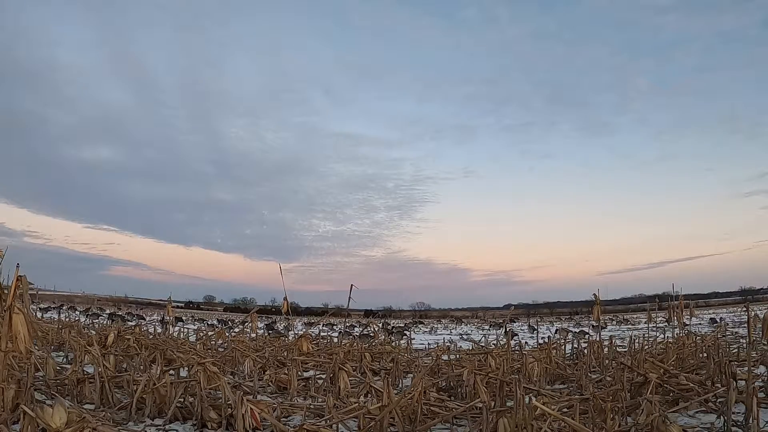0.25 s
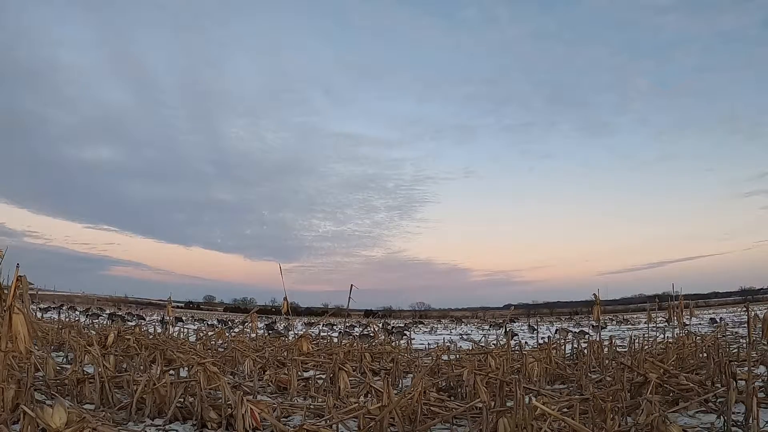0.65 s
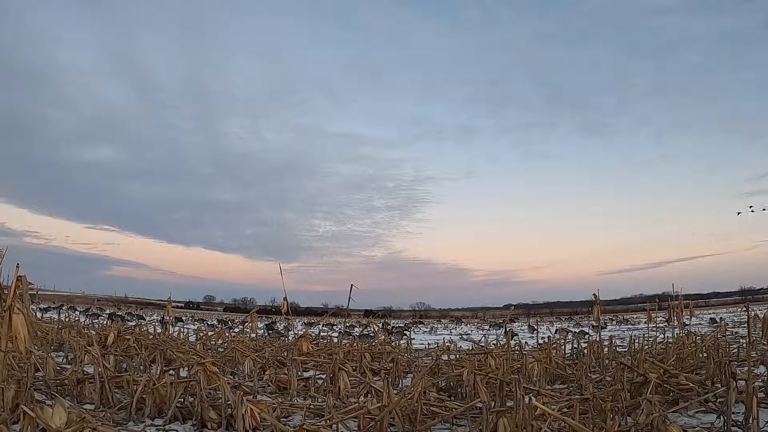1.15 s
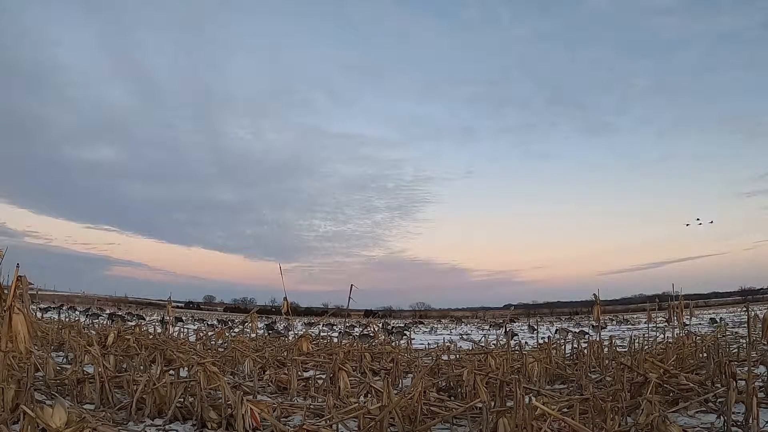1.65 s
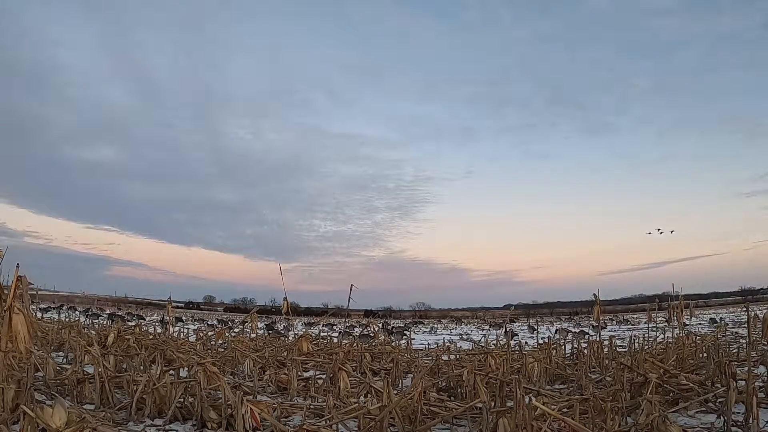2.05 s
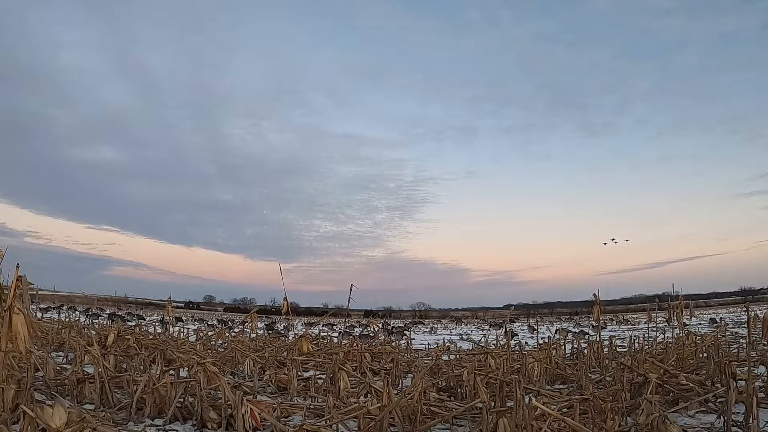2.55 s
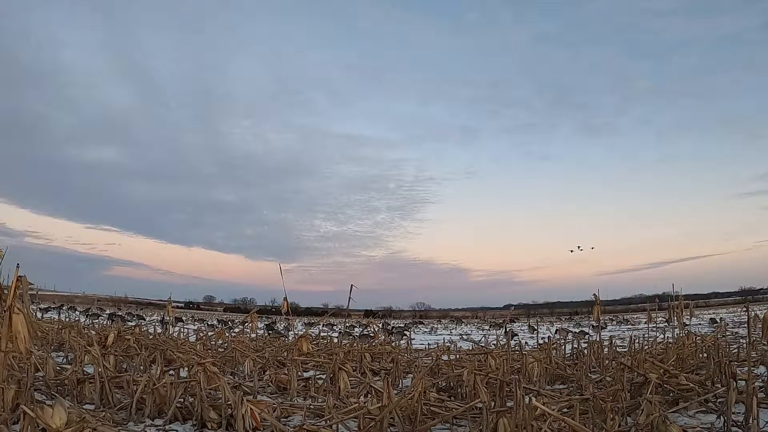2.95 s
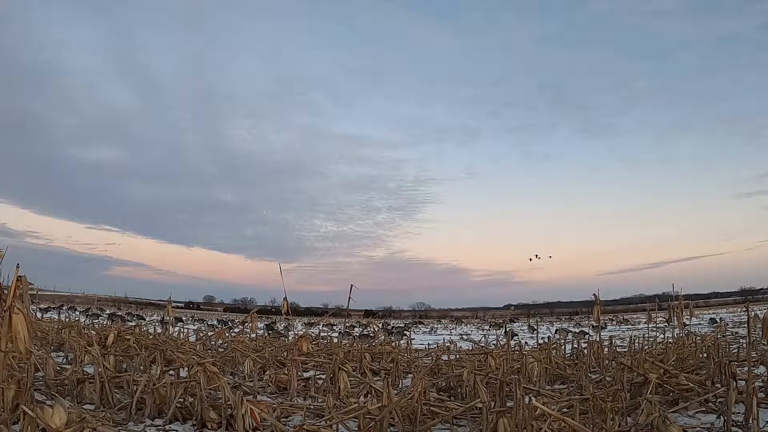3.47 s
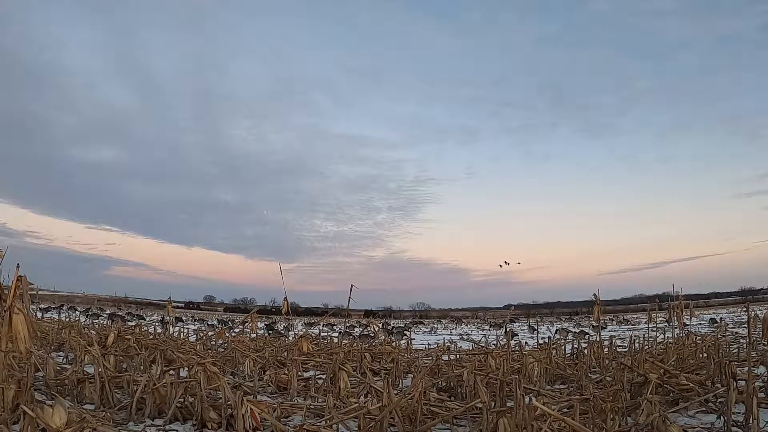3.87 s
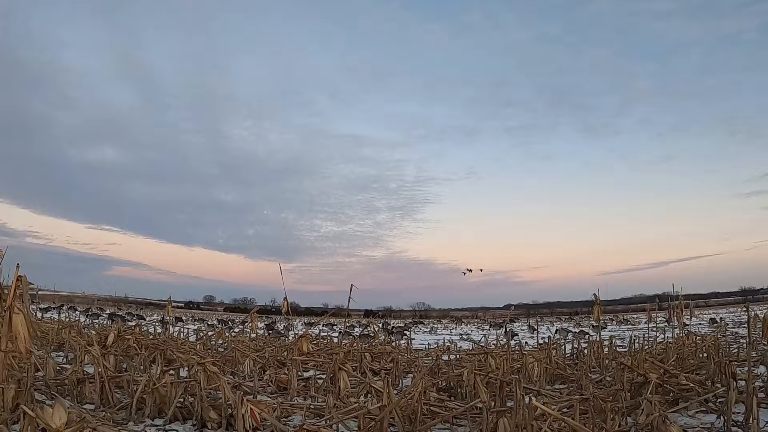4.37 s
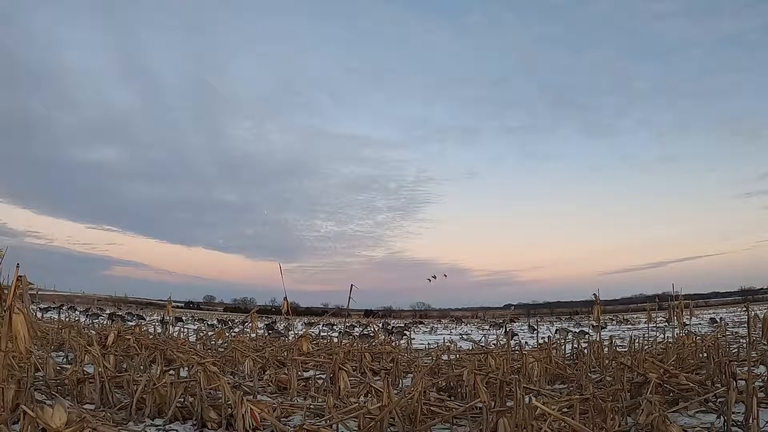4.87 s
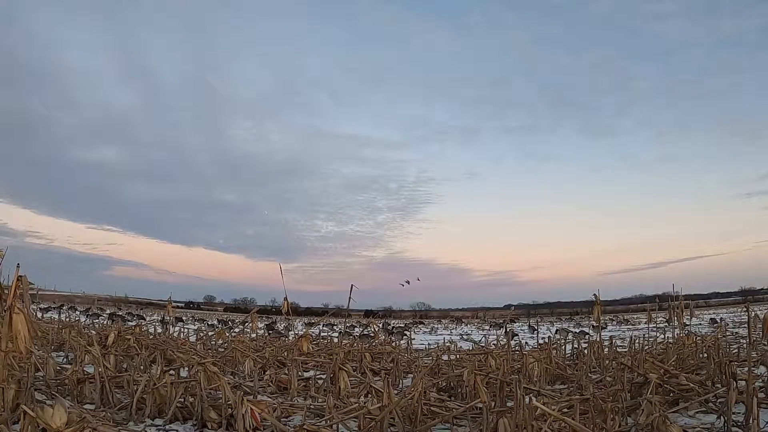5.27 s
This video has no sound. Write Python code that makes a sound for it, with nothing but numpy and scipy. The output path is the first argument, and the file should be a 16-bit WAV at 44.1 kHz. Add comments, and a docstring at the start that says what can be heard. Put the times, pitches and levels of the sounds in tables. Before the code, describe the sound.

A wide, quiet winter field with low wind rumble, a soft rush leaning left, and irregular dull thumps on the microphone, mostly left. At 0.1 s a reed goose call close on the left begins a hollow, nasal moan, rising slightly and firming until it drops off at 0.95 s; a far goose yips and holds a wavering honk beneath it until 0.43 s. Faint, low distant tones hover until about 1.5 s, when mainly wind remains. Around 1.95 s geese ahead and slightly right give gruff clucks and a soft honk. Clearer honks follow at about 2.9, 3.6, 4.2, 4.7, 5.25 and 5.5 s, most starting with a short yip and gruff rattle, cracking into a ringing tone, then falling to a faint rasp. Small clucks come near 3.9, 4.5 and 5.07 s. Calls become higher, louder and brighter. Dry stalks rustle faintly, clearest near 4.5 s; a slight field echo follows.

```python
"""A few geese fly in over a stubble field, ahead and to the right: most calls are a yip, a gruff stretch and a
clear, falling honk, built from syrinx harmonics or from single beats ringing in throat and beak.
Close by on the left a reed goose call gives one long moan, a sum of harmonics with weak lines between.
Wind rumbles and thumps on the two-port microphone and dry corn stalks rustle, all from shaped noise.
The open land adds a soft noise rush and a faint echo; a few low sine tones come from far away."""
import sys
import numpy as np
from scipy import signal
from scipy.fft import rfft, irfft, next_fast_len
from scipy.io import wavfile
from scipy.ndimage import uniform_filter1d, map_coordinates

SR = 44100
rng = np.random.default_rng(int(sys.argv[2]) if len(sys.argv) > 2 else 0)


def transcribe(u):
    """Save the signal u as a 16-bit wav file named by the first command-line argument.

    u: samples, shape (n,) or (channels, n), limited to [-1, 1]; the rate is SR.
    q: integer samples, one column per channel.
    """
    v = np.clip(np.atleast_2d(u).T, -1, 1)
    q = np.round(v * 32767).astype(np.int16)
    wavfile.write(sys.argv[1], SR, q)


N = 243431
T = np.arange(N) / SR


def amp(db):
    """Decibels to gain."""
    return 10 ** (np.asarray(db) / 20)


def unit(x):
    """Scale to rms 1."""
    return x / np.sqrt(np.mean(x ** 2) + 1e-20)


def along(points, hz):
    """Read (f/Hz, value) points on a log frequency axis."""
    f, value = np.transpose(points)
    return np.interp(np.log(hz + 1), np.log(f + 1), value)


def curves(rows, t):
    """Each column after the time, read at the times t."""
    s, *columns = np.transpose(rows)
    return [np.interp(t, s, column) for column in columns]


def span(start, end, fade=0.005):
    """Sample times of a sound and its soft-edged gate."""
    t = T[(T > start - fade) & (T < end + fade)]
    to_edge = np.minimum(t - start + fade, end + fade - t)
    return t, np.sin(np.pi / 2 * np.clip(to_edge / (2 * fade), 0, 1)) ** 2


def add(track, t, x):
    """Mix x into the track at the times t."""
    first = round(t[0] * SR)
    track[..., first:first + len(t)] += x


def wobble(rate, t):
    """A smooth random curve, rate knots a second."""
    knots = rng.standard_normal(4096)
    return map_coordinates(knots, [(t - t[0]) * rate + 2], mode="mirror")


def filtered(x, response):
    """x times a response of frequency."""
    size = x.shape[-1]
    m = next_fast_len(size + 8192)
    return irfft(rfft(x, m) * response(np.fft.rfftfreq(m, 1 / SR)), m)[..., :size]


def place(x, balance, lag_samples):
    """Put a source to one side by level (left over right, dB) and by arrival time between the ports."""
    side = np.array([[1], [-1]]) / 2

    def response(hz):
        delay = np.exp(-2j * np.pi * hz * side * lag_samples / SR)
        return amp(side * along(balance, hz)) * delay
    return filtered(x, response)


# how alike the two microphone ports hear diffuse noise: f/Hz, correlation (1 = identical)
PORT_LIKENESS = [(60, 0.9), (110, 1), (210, 0.82), (380, 0.99), (700, 0.63), (1300, 0.73), (2400, 0.27),
                 (4450, 0.055), (8230, 0.37)]


def stereo_noise(spectrum, patchy_db):
    """Noise with patches of random gain; mid and side shares set how alike the ports are, the mid has rms 1."""
    z = signal.stft(rng.standard_normal((2, N)), nperseg=512)[2]
    patches = uniform_filter1d(rng.standard_normal(z.shape[1:]), size=4, axis=0)
    patches = uniform_filter1d(patches, size=14, axis=1)
    pair = signal.istft(z * amp(patchy_db * unit(patches)), nperseg=512)[1][:, :N]

    def response(hz):
        turn = np.arccos(np.clip(along(PORT_LIKENESS, hz), -1, 1)) / 2
        return amp(along(spectrum, hz)) * np.array([np.cos(turn), np.sin(turn)])
    mid, side = filtered(pair, response)
    return np.array([mid + side, mid - side]) / np.std(mid)


# wind rumble spectrum on the microphone: f/Hz, relative level/dB
RUMBLE_SPECTRUM = [(12, -37), (20, 1), (38, 0), (72, 1.5), (162, -13.5), (198, -18.5), (236, -34.5),
                   (311, -31), (400, -44), (520, -59.5), (880, -120)]
# steady wind, left port over right: f/Hz, level/dB
WIND_BALANCE = [(30, 1.5), (95, 1.6), (310, 0.69)]
# gusts and thumps, left port over right: f/Hz, level/dB
GUST_BALANCE = [(30, 22), (150, 11), (400, 21.5)]


def wind(rumble_db=-37.5, swing_db=1.58, gust_db=-12, gust_s=0.061, gust_top_hz=130):
    """A rumble at both ports; gusts of low noise swell around each thump and strike mostly the left port."""
    rumble = amp(rumble_db + swing_db * wobble(9.2, T)) * stereo_noise(RUMBLE_SPECTRUM, patchy_db=0.25)
    # gust_db is against the thump, gust_s the width of its bell-shaped swell
    strength = sum(amp(db + gust_db) * np.exp(-.5 * ((T - s) / gust_s) ** 2) for s, db, *_ in THUMP_EVENTS)
    eddies = filtered(rng.standard_normal((2, N)),
                      lambda hz: amp(along(RUMBLE_SPECTRUM, hz)) / (1 + (hz / gust_top_hz) ** 4))
    gusts = strength * unit(eddies)
    return place(rumble, WIND_BALANCE, lag_samples=0) + place(gusts + thumps(), GUST_BALANCE, lag_samples=0)


# rush over the open land: f/Hz, relative level/dB
LAND_SPECTRUM = [(130, -23.5), (220, -2.5), (286, -7), (318, -4), (344, -7), (377, -3.5), (407, -4.5),
                 (697, 0), (963, 1.5), (1290, -4), (1460, -3.5), (2050, -13), (2960, -25), (3610, -34.5),
                 (8680, -52.5), (11300, -95.5), (19100, -120)]
# the rush, left port over right: f/Hz, level/dB
LAND_BALANCE = [(60, 2.0), (100, -1), (180, -0.5), (310, 2), (530, 5.5), (920, 11), (1600, 9.5), (2760, 14),
                (4760, 3), (8230, 2.5)]


def land(rush_db=-47.5, swell_db=0.9, swell_rate=1.2):
    """The soft noise of the open field, mostly from the left, swells and ebbs with the breeze."""
    level = amp(rush_db + swell_db * wobble(swell_rate, T))
    return place(level * stereo_noise(LAND_SPECTRUM, patchy_db=0.5), LAND_BALANCE, lag_samples=0.3)


# faint low tones from far away: t/s, length/s, f/Hz, mean peak level/dB
DISTANT_TONES = [(0.0, 0.78, 430, -55), (0.0, 0.62, 318, -57), (0.867, 0.44, 369.2, -56.5),
                 (0.98, 0.3, 430.3, -53), (1.033, 0.49, 328.4, -55.5), (1.083, 0.23, 492, -53)]


def far_tones(waver_db=2):
    """Sines of steady pitch fade in and out at the edge of hearing, wavering in level."""
    out = np.zeros(N)
    for s, length, hz, level_db in DISTANT_TONES:
        t, gate = span(s, s + length, fade=0.048)
        add(out, t, gate * amp(level_db + waver_db * wobble(2.5, t)) * np.sin(2 * np.pi * hz * t))
    return out


# resonance of a goose's throat: f/Hz, level/dB
THROAT_GAIN = [(900, -64), (1200, 6.5), (1650, -5), (2200, -17.5), (2900, -32), (3500, -47.5), (4000, -100)]
# bright ring of its open beak: f/Hz, level/dB
BEAK_GAIN = [(1700, -51), (2200, -15.5), (2950, -12.5), (3550, -7), (4480, -12.5), (4780, -17), (5250, -18),
             (5550, -23.5), (6600, -21.5), (7500, -22.5), (8300, -46), (9300, -40), (11500, -58),
             (12500, -74)]


def voice(t, pitch, level_db, low_db, treble_db, jitter, flutter_db, colour=lambda k: 0, rattle=0):
    """Syrinx harmonics through throat and beak; the beak part flutters, a rattle stresses every third cycle."""
    faint_db, faint_dulling = -53, 0.15  # below this treble level the top harmonics dim too (dB per dB)
    stray_rad_per_db = 0.1  # moving air also shakes the phase of the high harmonics
    phase = 2 * np.pi * np.cumsum(pitch * (1 + jitter * wobble(530, t))) / SR
    tone = amp(low_db) * np.sin(phase)
    stress = rattle * (np.cos(phase / 3 + wobble(90, t)) + wobble(400, t) / 3)
    for k in range(2, 16):
        throat = amp(level_db + along(THROAT_GAIN, k * pitch))
        shimmer_db = flutter_db * (0.6 * wobble(35, t) + 0.7 * wobble(140, t))
        dull_db = faint_dulling * np.maximum(faint_db - treble_db, 0) * (k > 6)
        beak = amp(treble_db + along(BEAK_GAIN, k * pitch) + shimmer_db - dull_db)
        stray = stray_rad_per_db * flutter_db * (k > 4) * wobble(76, t)
        strength = amp(colour(k)) * (throat * (1 + stress / 2) + beak * (1 + stress))
        tone += strength * np.sin(k * phase + stray + rng.uniform(-np.pi, np.pi) / 2)
    return np.sqrt(2) * tone


# yips that open most calls: t/s, length/s, mid-note f/Hz, throat level/dB, mid-note treble level/dB
YIP_NOTES = [(0.095, 0.026, 733, -42.5, -84), (2.781, 0.034, 715, -45, -61.5), (3.5, 0.034, 725, -43, -55),
             (4.103, 0.048, 730, -41.5, -63.5), (4.603, 0.022, 741, -38, -57.5),
             (5.16, 0.038, 764, -37, -53)]


def yips(rise=0.065, rough=0.0089, dull_db=6):
    """A short rising note that roughens as the voice breaks."""
    out = np.zeros(N)
    for s, length, hz, level_db, treble_db in YIP_NOTES:
        t, gate = span(s + 0.0038, s + length, fade=0.0064)
        u = (t - s) / length
        pitch = hz * (1 + rise * (u - .5))
        note = voice(t, pitch, level_db, level_db - 4.5, treble_db + 8 * (u - .5), rough * u,
                     flutter_db=6.0, colour=lambda k: -dull_db * (k > 6))
        add(out, t, gate * note)
    return out


# the long moan: t/s, f/Hz of its strong second harmonic, level before trim/dB
MOAN_PATH = [(0.122, 897.5, -44.5), (0.145, 908, -32), (0.166, 922, -32.5), (0.22, 935.4, -33.5),
             (0.301, 952, -33.5), (0.382, 949, -35.5), (0.445, 984.6, -29), (0.51, 986, -29.5),
             (0.57, 1004, -28), (0.73, 1020, -26), (0.862, 1023, -28.5), (0.896, 1015, -29),
             (0.917, 994, -33.5), (0.934, 950, -38.5), (0.95, 973, -56.5)]
# the reed's weak lines against its harmonics: t/s, halfway lines level/dB, quarter lines level/dB
REED_LINES = [(0.14, -21, -18), (0.26, -17, -19.5), (0.4, -11.5, -21.5), (0.53, -14, -21.5),
              (0.6, -26, -17), (0.92, -35.5, -19)]
# resonance of the call's barrel: f/Hz, level/dB
BARREL_GAIN = [(400, -24.5), (520, -27.5), (800, -41.5), (930, -2.5), (1100, -1.5), (1250, -6.5),
               (1420, -18), (1530, -19), (1870, -38), (1960, -24), (2050, -38.5), (2200, -30),
               (2440, -31.5), (2550, -27.5), (2700, -38.5), (2900, -34), (3060, -35), (3400, -46.5),
               (3570, -44.5), (4000, -55), (4400, -49), (4600, -42.5), (4850, -58), (5100, -55.5),
               (5700, -62), (7700, -71.5), (8600, -98.5)]


def moan(level_trim_db=5.0, overtone_db=-21, overtone_follow=0.2, bloom_db=9, bloom_s=0.092,
         release_db=14, release_s=0.031, flank_lift_db=9.0, flank_tilt_db=0.34, dull_db=5.5,
         haze_db=-45, haze_hz=3000):
    """Reed harmonics with weak lines at each quarter pitch between; all wander in level, with a noise haze."""
    out = np.zeros(N)
    t, gate = span(MOAN_PATH[0][0], MOAN_PATH[-1][0])
    second_hz, level_db = curves(MOAN_PATH, t)
    half_db, quarter_db = curves(REED_LINES, t)
    pitch = second_hz / 2
    over_db = overtone_db + overtone_follow * (level_db - level_db.max())
    over_db -= bloom_db * np.exp((t[0] - t) / bloom_s)
    over_db -= release_db * np.exp((t - t[-1]) / release_s)
    loose = 1 / (1 + np.exp((t - 0.45) / 0.016))  # the reed is unsteady until the blow is firm
    jitter = 0.0012 * (1 + 1.5 * loose)
    phase = 2 * np.pi * np.cumsum(pitch * (1 + jitter * wobble(300, t))) / SR
    for quarter in range(3, 68):
        k = quarter / 4
        overtone, weak = k > 3.6, quarter % 4 > 0
        flank_db = [0, quarter_db, half_db, quarter_db][quarter % 4]
        flank_db = np.minimum(flank_db + overtone * (flank_lift_db + flank_tilt_db * (k - 4)), 0)
        drive_db = over_db if overtone else level_db + level_trim_db
        soft_db = dull_db * loose * np.clip(k - 7, 0, 2)  # a soft blow lacks the top harmonics
        wander_db = (0.25 * min(k, 9) + 1.3 * weak) * (wobble(12, t) + 0.5 * wobble(60, t))
        line_db = drive_db + along(BARREL_GAIN, k * pitch) + flank_db - soft_db + wander_db
        add(out, t, np.sqrt(2) * gate * amp(line_db) * np.sin(k * phase + rng.uniform(0, 2 * np.pi)))
    puffs = rng.standard_normal(len(t)) * (1 + np.cos(phase))  # noise at each slap of the reed
    haze = filtered(puffs, lambda hz: amp(along(BARREL_GAIN, hz)) * hz ** 6 / (hz ** 6 + haze_hz ** 6))
    add(out, t, gate * amp(over_db + haze_db) * unit(haze))
    return out


def croak(t, level_db, throat_hz, treble_db, slack_db, unsteady=1, rasp_top_hz=5200, rest_hz=1170, tighten=0.42):
    """The low register: beats ring the throat at the second harmonic and snap in the beak; each third is strong."""
    scatter_db, scatter_s = 2.5, 0.00011  # beat strength and timing
    throat_scatter, throat_ring_s = 0.06, 0.0012  # share of the ring's pitch, and its decay
    rasp_hz, rasp_width_hz, rasp_db = 4050, 550, 6  # the snaps' extra peak, before the throat's stretch
    cycles = np.cumsum(throat_hz / 2) / SR
    beat = np.arange(int(cycles[-1]))
    chance = rng.standard_normal((80, 4))[beat]
    weak = beat % 3 > 0
    beats = np.interp(beat, cycles, t) + unsteady * scatter_s * chance[:, 0]
    body_size = amp(scatter_db * chance[:, 1] + slack_db * weak)
    snap_size = amp(scatter_db * chance[:, 2] + slack_db * weak)
    age = np.maximum(t - beats[:, None], 0)
    ring = np.exp(-age / throat_ring_s)
    ring_hz = np.interp(beats, t, throat_hz) * (1 + unsteady * throat_scatter * chance[:, 3])
    body = body_size @ (ring * np.sin(2 * np.pi * ring_hz[:, None] * age))
    body = filtered(body, lambda hz: 1 / (1 + (hz / 2200) ** 6))
    snaps = snap_size @ np.sinc((t - beats[:, None]) * SR / 2)  # one click a closure
    stretch = (np.mean(throat_hz) / rest_hz) ** tighten  # a tighter throat rings higher in the beak too

    def beak_response(hz):
        relaxed_hz = hz / stretch
        peak_db = rasp_db * np.exp(-.5 * ((relaxed_hz - rasp_hz) / rasp_width_hz) ** 2)
        return amp(along(BEAK_GAIN, relaxed_hz) + peak_db) / (1 + (hz / rasp_top_hz) ** 10)
    rasp = filtered(snaps, beak_response)
    return amp(level_db) * unit(body) + amp(treble_db) * unit(rasp)


# gruff stretches that lead into a honk, most after a yip: t/s, length/s, first throat f/Hz,
# final throat f/Hz, final level/dB, opening treble level/dB, closing treble level/dB
GRUFF_STRETCHES = [(0.169, 0.048, 1304, 1194, -40, -74, -70), (2.11, 0.035, 1134, 1300, -40.5, -70, -71),
                   (2.814, 0.091, 973, 1300, -34, -61, -45), (3.523, 0.085, 1006, 1324, -32, -55, -49),
                   (4.129, 0.063, 1010, 1280, -34.5, -55, -50), (4.629, 0.072, 1111, 1428, -32.5, -54, -43),
                   (5.184, 0.063, 1218, 1388, -32.5, -46, -40), (5.431, 0.054, 1152, 1410, -36.5, -54, -50)]


def gruff(climb_s=0.042, swell_db=6, opening_db_per_s=454.5, closing_db_per_s=479.5, rattle_db=-12):
    """A low rattle glides to its final note and swells; its rasp fades after the opening and grows into the honk."""
    out = np.zeros(N)
    for s, length, low_hz, final_hz, level_db, opening_db, closing_db in GRUFF_STRETCHES:
        t, gate = span(s, s + length)
        age = np.clip(t - s, 0, length)
        slack = np.minimum((length - age) / climb_s, 1)
        throat_hz = final_hz + (low_hz - final_hz) * slack
        treble_db = np.maximum(opening_db - opening_db_per_s * age,
                               closing_db - closing_db_per_s * (length - age))
        add(out, t, gate * croak(t, level_db - swell_db * slack, throat_hz, treble_db, rattle_db))
    return out


# the first, drawn-out honk: t/s, mean f/Hz, mean throat level/dB
LONG_HONK_PATH = [(0.19, 690, -46), (0.216, 677, -37), (0.264, 698, -35), (0.3, 705.7, -38.5),
                  (0.351, 709, -36), (0.405, 671, -38.5), (0.435, 655, -52)]
HOARSE = 0.12  # depth of the rattle that stays in any honk


def long_honk(low_db=-6, treble_db=-27, pulse_hz=26, pulse_db=2.5, waver=0.004):
    """One far goose holds a wavering honk; its level pulses as it sounds together with the reed's third harmonic."""
    out = np.zeros(N)
    t, gate = span(LONG_HONK_PATH[0][0], LONG_HONK_PATH[-1][0])
    pitch, level_db = curves(LONG_HONK_PATH, t)
    pulse = np.cos(2 * np.pi * pulse_hz * (t - t[0]) + wobble(18, t) / 2)
    wavering = pitch * (1 + waver * wobble(45, t))
    call = voice(t, wavering, level_db + pulse_db * pulse, level_db + low_db, level_db + treble_db,
                 jitter=0.0053, flutter_db=7.0, rattle=HOARSE)
    add(out, t, gate * call)
    return out


# wind thumps on the microphone, before left-right balance: t/s, level/dB, width/s, eddy f/Hz
THUMP_EVENTS = [(0.317, -31, 0.017, 77), (0.371, -35.5, 0.017, 112.2), (0.495, -26.5, 0.012, 120),
                (0.589, -34, 0.0047, 118.5), (1.213, -33.5, 0.0095, 116.3), (2.054, -41.5, 0.019, 100.4),
                (2.358, -36.5, 0.021, 81), (2.65, -39.5, 0.011, 107.3), (3.084, -25, 0.0057, 117),
                (3.247, -36.5, 0.0056, 109.4), (4.048, -33.5, 0.0091, 70.3), (4.757, -24, 0.011, 112.4),
                (4.958, -30, 0.013, 79), (5.187, -29.5, 0.0044, 126)]


def thumps(own_db=-6):
    """Single eddies hit the microphone: a few slow swings of pressure, a little different at each port."""
    out = np.zeros((2, N))
    for s, level_db, width, eddy_hz in THUMP_EVENTS:
        t = s + (np.arange(SR // 4) - SR // 8) / SR
        swell = np.exp(-.5 * ((t - s) / width) ** 2)
        # shared swirl plus each port's own
        swirl = rng.standard_normal(len(t)) + amp(own_db) * rng.standard_normal((2, len(t)))
        eddy = swell * filtered(swirl, lambda hz: (hz / eddy_hz) / (1 + (hz / eddy_hz) ** 4.7))
        eddy *= np.linalg.norm(swell) / np.linalg.norm(eddy, axis=1, keepdims=True)
        add(out, t, amp(level_db) * eddy)
    return out


# dry stalks rustling: t/s, level/dB, time to fall 60 dB/s
RUSTLE_EVENTS = [(1.64, -68.5, 1), (2.515, -67, 0.094), (3.512, -67.5, 0.13), (4.476, -58.5, 0.17)]
# colour of a dry stalk: f/Hz, relative level/dB
STALK_SPECTRUM = [(1500, -22.5), (3000, 5.5), (4700, -8), (6000, -7.5), (7800, -8.5), (8800, -29),
                  (12000, -29.5), (14000, -70.5)]


def stalks(grain_db=4.5):
    """Dry leaves scrape in grainy bursts of noise that start fast and die away."""
    level = 0
    for s, db, decay in RUSTLE_EVENTS:
        attack = np.clip((T - s) / 0.013 + 1, 0, 1)
        level = level + amp(db - 60 * np.maximum(T - s, 0) / decay) * attack
    leaves = stereo_noise(STALK_SPECTRUM, patchy_db=2)
    return level * unit(amp(grain_db * wobble(1100, T)) * leaves)


# lone gruff clucks: t/s, length/s, throat f/Hz, glide/share, peak level/dB, peak treble level/dB,
# weak beats level/dB, unsteadiness (1 = the full scatter of a croak)
CLUCK_CALLS = [(1.962, 0.05, 1036, 0.063, -39.5, -71.5, -10, 1.1),
               (2.014, 0.1, 1014, 0.09, -36.5, -64, -4.5, 0.7), (3.897, 0.1, 1182, 0, -46.5, -71, -9, 0.9),
               (4.499, 0.046, 1175, 0, -41.5, -72.5, -18, 1),
               (5.069, 0.058, 1345, -0.088, -37.5, -54.5, -9, 0.45)]


def clucks(edge_db=10, treble_edge_db=17, bend=0.019, early=0.93):
    """A cluck stays in the low register; it may glide, and level and rasp peak just before the middle."""
    out = np.zeros(N)
    for s, length, hz, glide, level_db, treble_db, slack_db, unsteady in CLUCK_CALLS:
        t, gate = span(s, s + length)
        u = np.clip((t - s) / length, 0, 1)
        edge = (2 * u ** early - 1) ** 2
        throat_hz = hz * (1 + glide * (u - .5) - bend * edge)
        cluck = croak(t, level_db - edge_db * edge, throat_hz, treble_db - treble_edge_db * edge,
                      slack_db, unsteady)
        add(out, t, gate * cluck)
    return out


# clear honks: t/s, length/s, base f/Hz, pitch drift/share, settling/s, base throat level/dB,
# base fundamental level/dB, third harmonic lift/dB, fourth harmonic lift/dB, base treble level/dB,
# treble dimming/dB, mid-honk beak ring f/Hz
HONK_CALLS = [(2.125, 0.13, 681.5, 0.012, 0.024, -44.5, -44, -1.5, -8.5, -64.5, 3, 3700),
              (2.881, 0.17, 693.7, 0.026, 0.012, -38.5, -41.5, 0, -3.5, -57.5, 10.5, 3900),
              (3.597, 0.15, 717.5, 0.0089, 0.011, -37, -42.5, 3, 6, -56.5, 4.5, 3800),
              (4.179, 0.12, 725, 0.0044, 0.016, -33.5, -42.5, -3, 5.5, -57.5, 9.5, 4030),
              (4.687, 0.1, 745.3, -0.014, 0.0038, -30, -41, -2.5, -3, -38.5, 6, 4000),
              (5.236, 0.12, 748, 0.002, 0.0034, -29, -41.5, 2, -11, -35, 7, 4600),
              (5.484, 0.071, 816, -0.035, 0.006, -29, -43.5, -3, -4, -41.5, 1, 4650)]


def honks(steady=0.0018, fray=0.01, sag_db=1, low_sag_db=4, arch_db=3, waver=0.0022):
    """Each honk cracks in, locks into an arching tone whose ring slides upward, and frays as it falls."""
    scoop, scoop_s = 0.013, 0.015  # share below pitch at the start, and its decay time
    onset_db, onset_s = 4, 0.009  # how far down it swells in from, and how fast
    crack, crack_rattle = 0.021, 1.1  # pitch scatter and rattle depth as it cracks in
    fall, fall_s = 0.12, 0.046  # share the pitch drops as the air runs out, and over what time
    release_db, release_s = 18, 0.009  # the voice dies away
    shut_db, shut_s = 36, 0.041  # the treble goes first, as the beak shuts
    slide_hz, ring_width_hz, ring_db = 800, 540, 9  # the beak's ring
    near_flutter_db, flutter_grows = 1.4, 0.14  # grows as the treble fades with distance (dB per dB)
    out = np.zeros(N)
    for (s, length, hz, drift, settle, level_db, low_db, third_db, fourth_db,
         treble_db, dimming_db, beak_hz) in HONK_CALLS:
        t, gate = span(s, s + length, fade=0.004)
        age, left = np.maximum(t - s, 0), np.maximum(s + length - t, 0)
        past_middle = age / length - .5
        falling = np.maximum(1 - left / fall_s, 0) ** 2
        shutting = np.maximum(1 - left / shut_s, 0) ** 2
        cracking = np.exp(-age / settle)
        bend = drift * past_middle - scoop * np.exp(-age / scoop_s) - fall * falling
        pitch = hz * (1 + bend + waver * wobble(40, t))
        swell_in_db = onset_db * np.exp(-age / onset_s)
        loss_db = release_db * np.exp(-left / release_s) + sag_db * past_middle + swell_in_db
        treble_loss_db = swell_in_db / 2 + dimming_db * past_middle + shut_db * shutting
        jitter = steady + crack * cracking + fray * falling
        ring_hz = beak_hz + slide_hz * past_middle
        flutter_db = near_flutter_db + flutter_grows * max(-35.5 - treble_db, 0)

        def colour(k):
            lift_db = {3: third_db, 4: fourth_db}.get(k, 0)
            arch = (k > 2) * arch_db * (2 * past_middle) ** 2
            ring = np.exp(-.5 * ((k * pitch - ring_hz) / ring_width_hz) ** 2) - .5
            return lift_db - arch + (k > 4) * ring_db * ring
        honk = voice(t, pitch, level_db - loss_db, low_db - loss_db - low_sag_db * past_middle,
                     treble_db - treble_loss_db, jitter, flutter_db, colour, HOARSE + crack_rattle * cracking)
        add(out, t, gate * honk)
    return out


def creaks(length_s=0.059, lead_s=0.021, body_db=-17, rasp_db=-22, fade_db=14, drop=0.09):
    """As a honk falls, the voice slips back into its low register and trails off in a faint rasp."""
    out = np.zeros(N)
    for s, length, hz, _, _, level_db, *_, treble_db, _, _ in HONK_CALLS:
        start = s + length - lead_s
        if start < T[-1]:  # skip a creak past the end of the sound
            t, gate = span(start, start + length_s)
            fading_db = fade_db * (t - start) / length_s
            throat_hz = np.full(len(t), 2 * hz * (1 - drop))
            creak = croak(t, level_db + body_db - fading_db, throat_hz,
                          treble_db + rasp_db - fading_db, slack_db=0.0)
            add(out, t, gate * creak)
    return out


# echo of the land: f/Hz, t60/s
LAND_DECAY = [(300, 9.9), (1200, 1.9), (3000, 0.64), (8000, 0.097)]


def echo(x):
    """Stubble and far tree lines scatter the calls back: a decaying noise tail, the treble dying first."""
    hz, t, z = signal.stft(rng.standard_normal((2, SR)), SR, nperseg=256)
    decay = amp(-60 * t / along(LAND_DECAY, hz)[:, None])
    tail = signal.istft(z * decay, SR, nperseg=256)[1]
    return signal.fftconvolve(x[None], tail / np.linalg.norm(tail[0]), axes=1)[:, :N]


# geese, left port over right: f/Hz, level/dB
GEESE_BALANCE = [(700, -2.5), (1500, -4), (2800, -0.5), (4500, -1)]
# reed call, left port over right: f/Hz, level/dB
REED_BALANCE = [(1600, 3.26), (2700, 8.3), (4700, 1.3), (8000, 1)]


def scene():
    """Geese ahead and to the right, the reed call close on the left, wind all round."""
    geese = yips() + gruff() + long_honk() + clucks() + honks() + creaks()
    reed = moan()
    calls = place(geese, GEESE_BALANCE, lag_samples=1.69) + place(reed, REED_BALANCE, lag_samples=0.91)
    sent_out = amp(-23.0) * geese + amp(-46.5) * reed
    scattered = filtered(sent_out, lambda hz: 1 / (1 + (hz / 3500) ** 2))  # distance dulls it
    return wind() + land() + far_tones() + calls + stalks() + echo(scattered)


TOP_HZ = 12600


def record(dry):
    """The microphone's recorder keeps nothing at or above its band limit."""
    return filtered(dry, lambda hz: hz < TOP_HZ)


dry = scene()
out = record(dry)
transcribe(out)
```